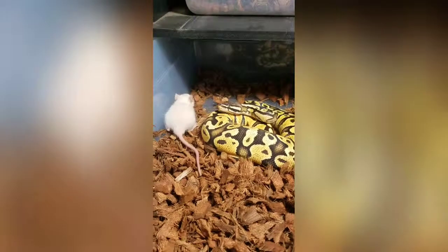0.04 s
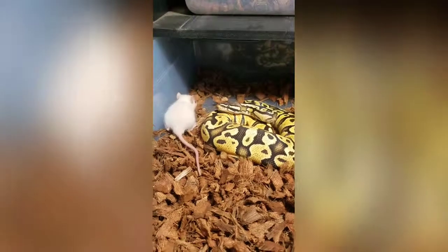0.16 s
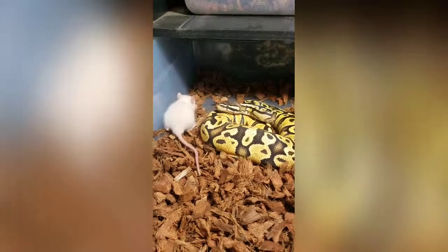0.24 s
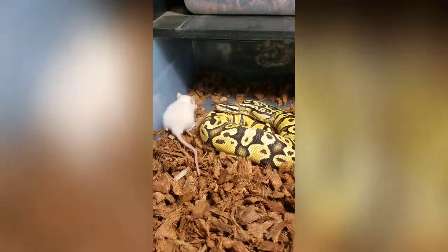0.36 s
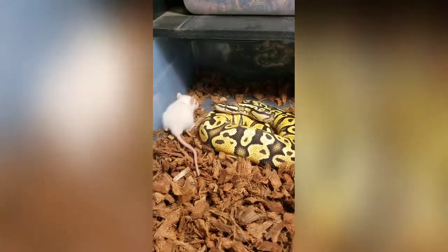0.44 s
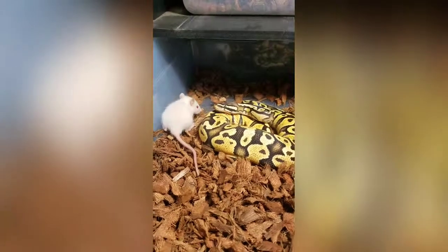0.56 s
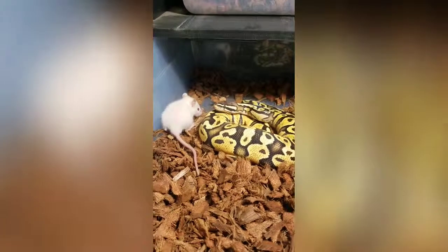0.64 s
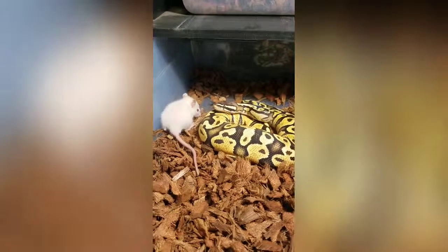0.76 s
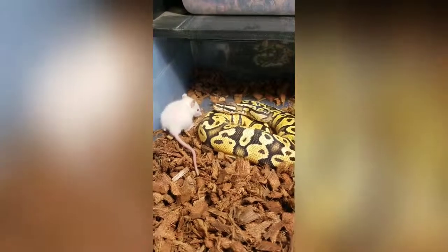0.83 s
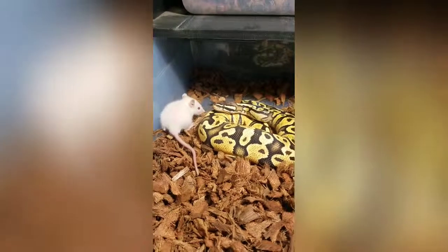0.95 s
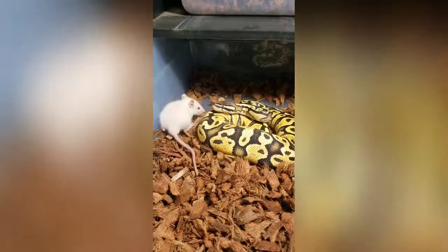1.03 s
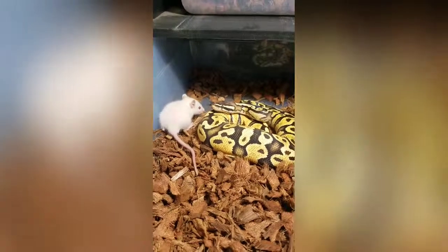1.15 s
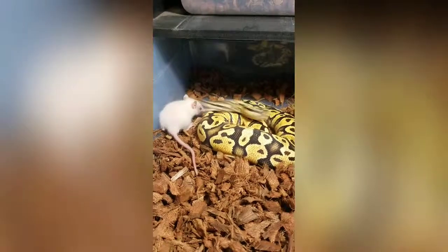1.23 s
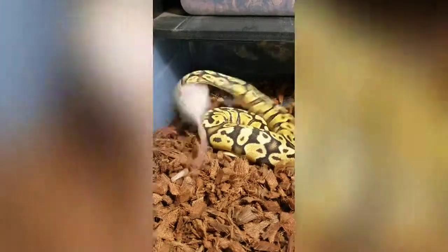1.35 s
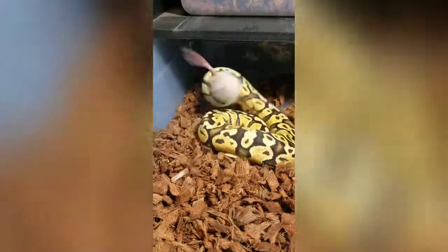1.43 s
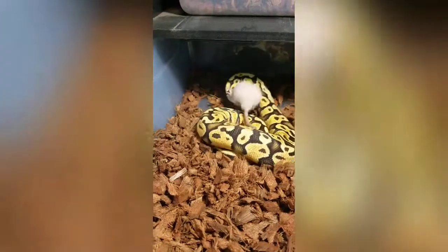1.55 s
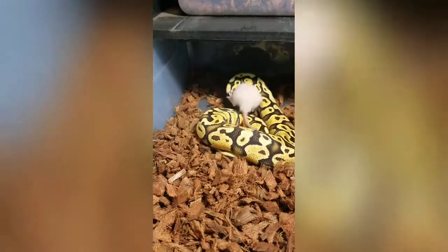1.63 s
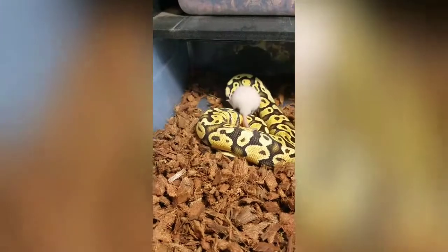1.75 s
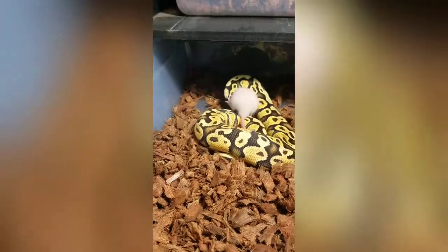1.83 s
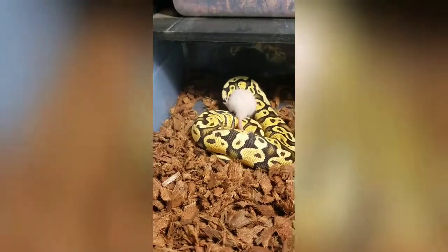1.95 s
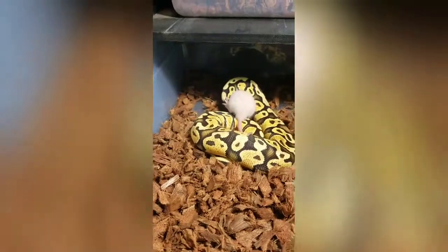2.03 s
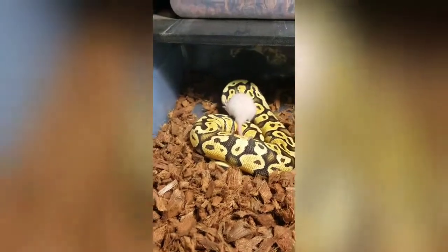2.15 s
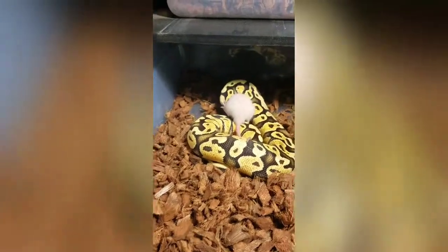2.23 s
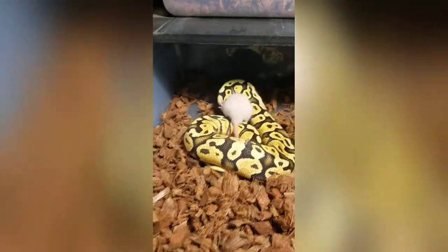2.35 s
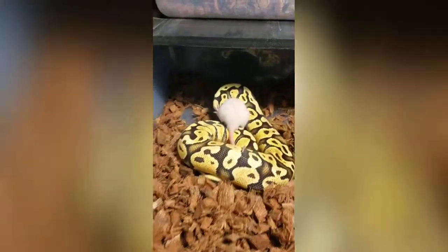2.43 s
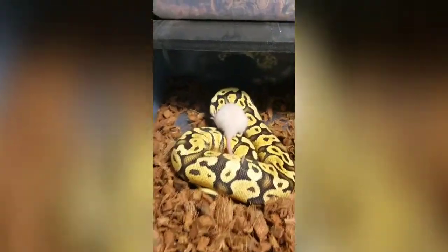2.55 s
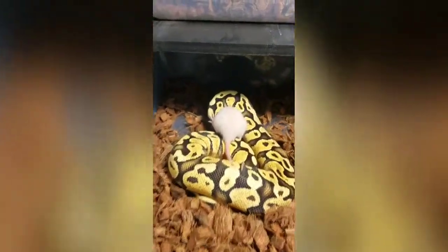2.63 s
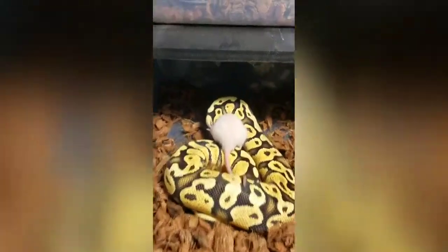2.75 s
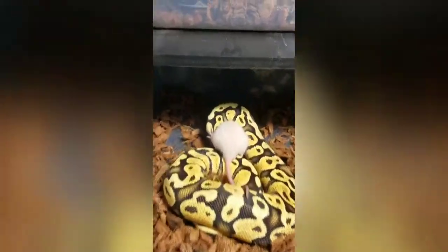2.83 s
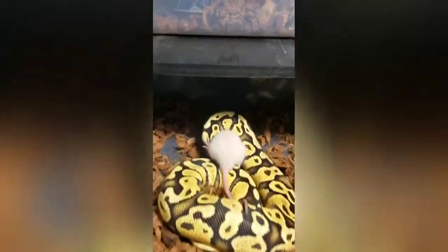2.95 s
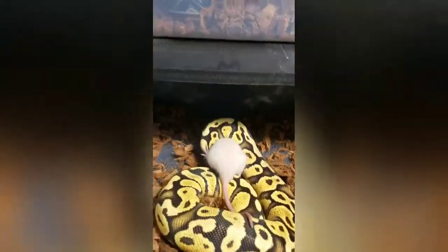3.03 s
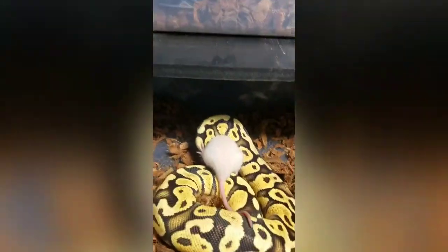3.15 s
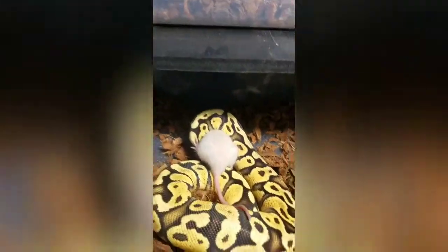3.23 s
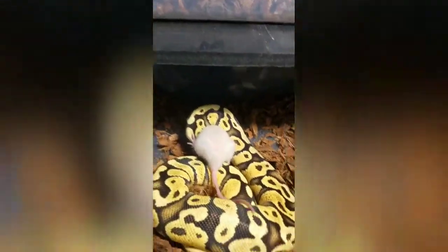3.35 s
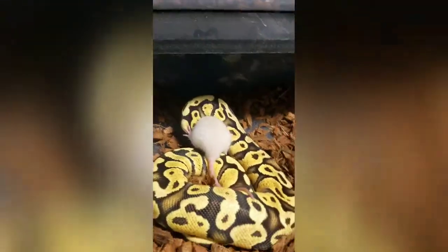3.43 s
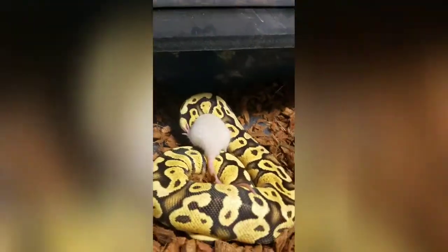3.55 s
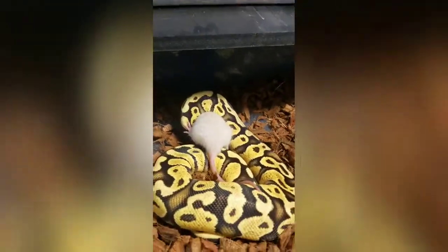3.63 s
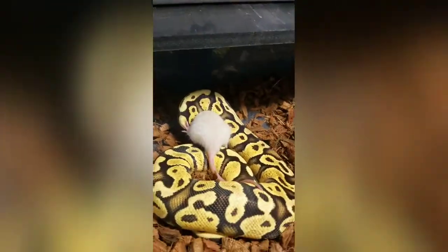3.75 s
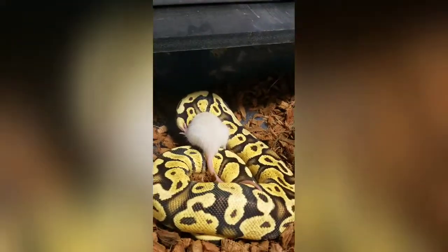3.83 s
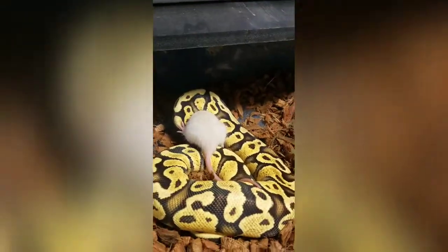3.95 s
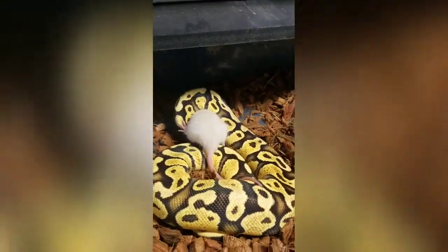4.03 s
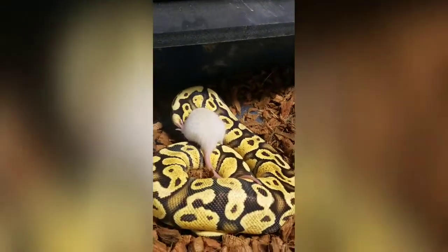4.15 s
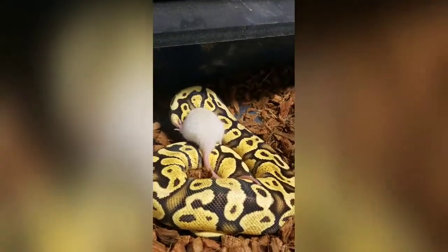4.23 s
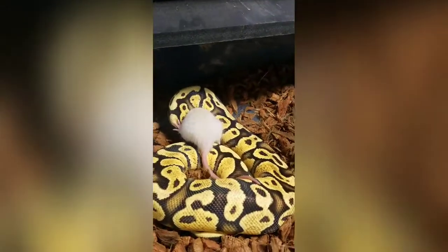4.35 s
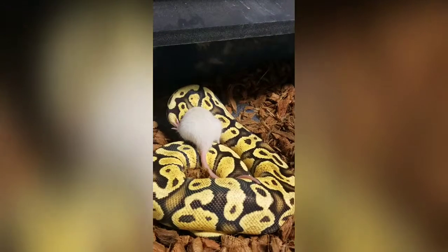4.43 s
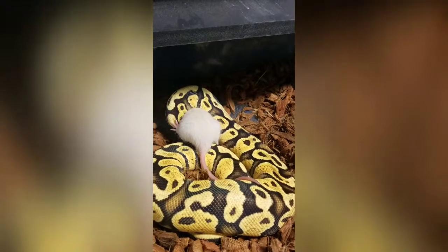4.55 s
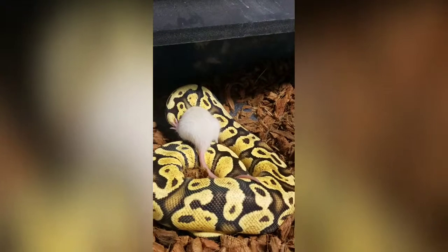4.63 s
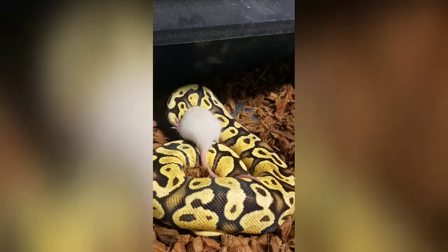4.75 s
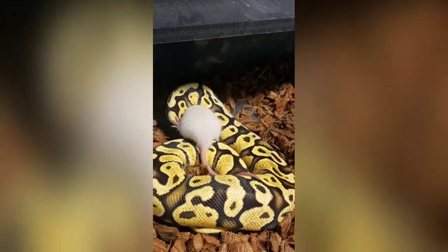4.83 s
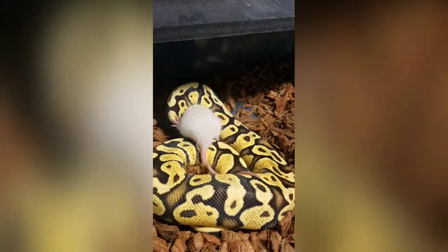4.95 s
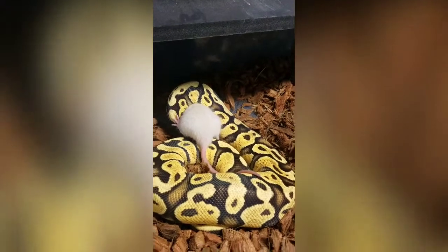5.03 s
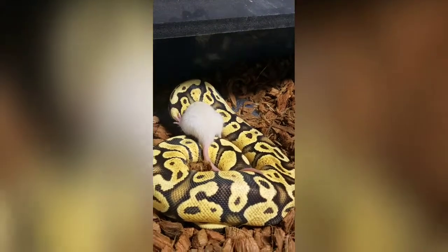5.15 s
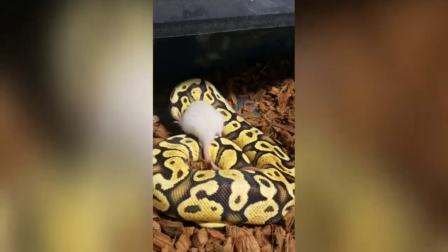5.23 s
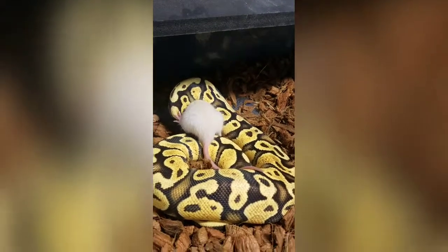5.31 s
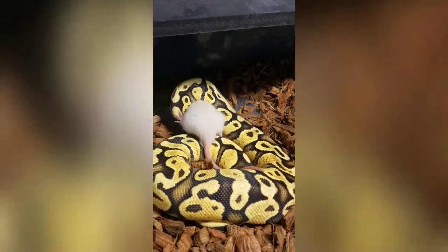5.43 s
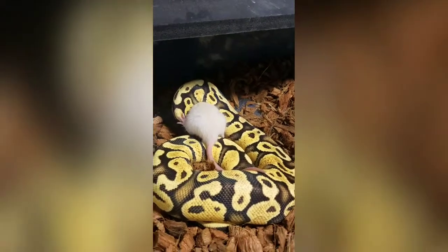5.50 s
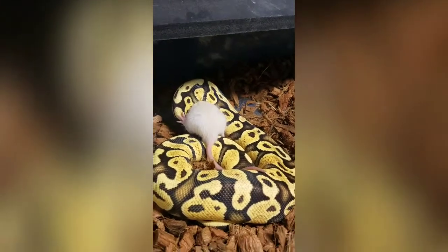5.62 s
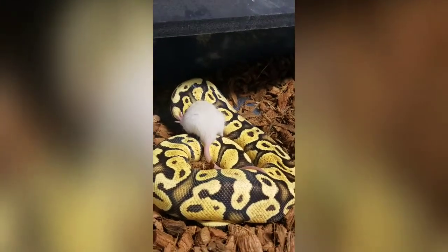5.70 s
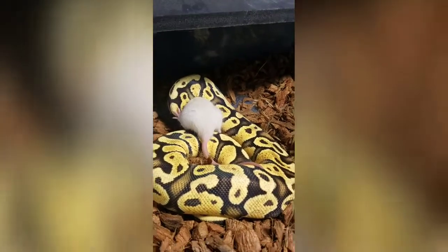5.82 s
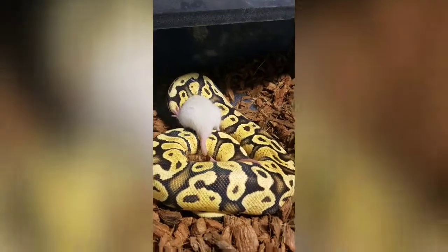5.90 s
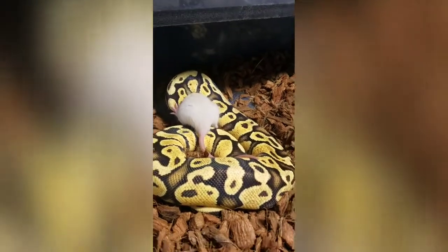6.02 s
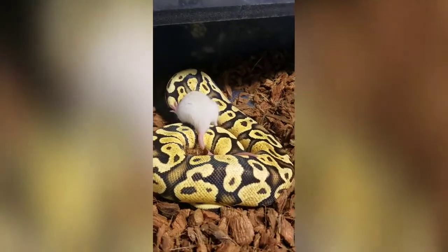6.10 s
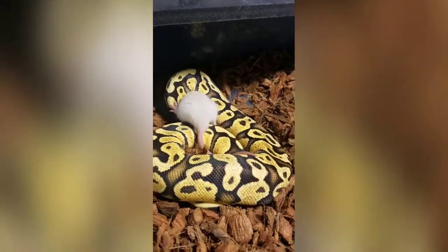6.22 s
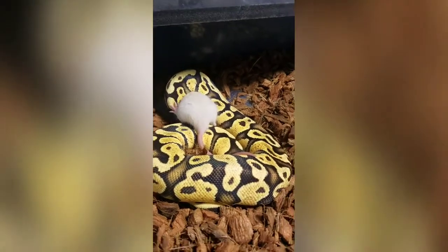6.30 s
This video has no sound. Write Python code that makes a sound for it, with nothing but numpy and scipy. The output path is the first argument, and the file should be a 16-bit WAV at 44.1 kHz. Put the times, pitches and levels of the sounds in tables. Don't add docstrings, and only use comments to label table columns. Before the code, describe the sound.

Close stereo pickup indoors: low room rumble and thin hiss, then a boomy plastic thud with crackling bark as a snake lunges. A rodent's piercing, fluttering squeal bursts out at once, followed by a brief cry. Small clicks and ticks fill the gap. Further squeals return while it is squeezed, gradually rougher, breathier and weaker, ending in short broken lower squeaks and slight wall knocks.

```python
import sys
import numpy as np
from scipy import signal
from scipy.fft import rfft, irfft, next_fast_len
from scipy.io import wavfile
from scipy.ndimage import uniform_filter1d

SR = 44100
rng = np.random.default_rng(int(sys.argv[2]) if len(sys.argv) > 2 else 0)


def unload_wav(signal):
    wavfile.write(
        sys.argv[1],
        SR,
        np.round(np.clip(np.atleast_2d(signal).T, -1, 1) * 32767).astype(np.int16),
    )


def gain_from_db(level_db):
    decades = np.asarray(level_db, float) / 20
    return 10 ** decades


N = 280917
MOUTH_DB = 4

# t/s, effort/dB, pitch/Hz
STRUCK_CALLS = [
    [(1.396, -34.5, 2050), (1.446, -20.5, 2200), (1.506, -14, 2100), (1.6, -15.5, 2111),
     (1.68, -17.5, 2201), (1.772, -17.5, 2151), (1.808, -29.5, 2200)],
    [(2.109, -31.5, 2290), (2.129, -21.5, 2277), (2.161, -21.5, 2278), (2.19, -17, 2230),
     (2.203, -29.5, 2270)],
]
COILED_CALLS = [
    [(3.582, -31.5, 2203), (3.604, -23.5, 2195), (3.7, -19.5, 2168), (3.79, -20.5, 2124), (3.87, -22, 2104),
     (3.902, -24, 2160), (3.915, -27.5, 2248), (3.965, -27.5, 2222), (3.979, -32, 2270)],
    [(4.289, -23, 1975), (4.31, -22, 1959), (4.32, -18, 2095), (4.41, -18, 2110), (4.5, -23.5, 2078),
     (4.535, -24, 2151), (4.58, -25.5, 2027), (4.629, -32, 1900)],
]
FAILING_CALLS = [
    [(4.961, -27, 2060), (4.985, -24.5, 1947), (5.016, -19.5, 2058), (5.035, -21, 2030), (5.146, -24, 2049),
     (5.165, -26, 2036), (5.214, -28.5, 1900), (5.282, -24.5, 1875)],
    [(5.712, -24.5, 1940), (5.73, -22, 2013), (5.76, -25.5, 2046), (5.785, -21.5, 2020),
     (5.86, -21.5, 2038), (5.906, -31.5, 1982), (5.95, -24.5, 1824), (5.969, -32.5, 1834)],
]
# left-right/dB, lift of first tone/dB, lift of second tone/dB, breath hiss/dB
POSES = [(-6.5, 2, -4.5, -16), (-5.5, -8, -3.5, -16.5), (-7.5, 2, 1.5, -6.5), (-7.5, -0.5, -1.5, -8),
         (-3.5, 3, 2.5, -5), (-6.5, -1, 2, -5)]
FLUTTERS_HZ = [68, 75, 92, 76, 72, 72]
# t/s, length/s, effort/dB, first pitch/Hz, last pitch/Hz
LOW_NOTES = [(4.633, 0.047, -27.5, 1336, 1416), (5.286, 0.074, -25.5, 1397, 1353),
             (5.368, 0.03, -29, 1403, 1325), (5.394, 0.036, -26, 1426, 1356),
             (5.97, 0.028, -27, 1286, 1110), (6.002, 0.046, -31, 1936, 1540),
             (6.052, 0.096, -32.5, 1420, 1305), (6.168, .036, -28.5, 1278, 1458)]
LOW_POSE = (-6.5, 1, -0.5, -7.5)
CLEAR, SHAKY, FLUTTER, TRILL = (.13, .006, .04), (.14, .01, .3), (.15, .025, .08), (.15, .055, .06)
SPLIT, TORN, ROUGH, RASPY = (.2, .008, .9), (.33, .022, .75), (.58, .04, .65), (.82, .03, .3)
WHEEZE, CRACKED = (.33, .016, .9), (.26, .012, .1)
# t/s, state
FOLD_STATES = [(0, TORN), (1.44, ROUGH), (1.485, FLUTTER), (1.615, TRILL), (1.787, ROUGH), (3.645, FLUTTER),
               (3.785, CLEAR), (3.915, TORN), (4.1, SPLIT), (4.316, FLUTTER), (4.4, SHAKY), (4.45, CLEAR),
               (4.521, ROUGH), (4.541, CLEAR), (4.63, RASPY), (4.8, TORN), (5.01, SHAKY), (5.13, CLEAR),
               (5.283, CRACKED), (5.36, RASPY), (5.6, TORN), (5.785, SHAKY), (5.825, CLEAR), (5.963, SHAKY),
               (6.004, WHEEZE), (6.16, RASPY)]
# f/Hz, level/dB
THROAT = [(350, -52), (600, -15.5), (1570, -28.5), (2090, -17.5), (3120, -11.5), (4050, -7.5), (5330, -7),
          (6290, 3), (7300, -4), (8390, -13.5), (9240, -21), (11800, -14), (16000, -20.5)]
# f/Hz, level/dB per Hz
RASP = [(88, -61.5), (150, -36.5), (601, -17), (745, -20), (821, -16.5), (1140, -15.5), (1390, -19),
        (2980, -11.5), (4000, -13), (5790, -8), (6770, -4.5), (9440, -17.5), (14800, -40.5), (16000, -47)]
# pitch multiple, second multiple, level/dB
MIXING_TONES = [(3, -1, -18.5), (-3, 2, -23), (2, -1, -31), (4, -2, -31), (5, -1, -24.5)]
# t/s, floor boom/dB, wall knock/dB
THUDS = [(1.284, -22, -33.5), (1.342, -29, -36), (1.393, -46, -44), (1.519, -40, -26), (1.55, -34.5, -31),
         (2.172, -69, -57), (3.617, -37.5, -32.5), (4.979, -69, -64), (5.229, -63, -46),
         (6.088, -43, -48.5), (6.133, -62, -35.5), (6.145, -35, -39), (6.171, -42, -35)]
# t/s, knock/dB, tick/dB, left-right/dB
TICKS = [(0.752, -58, -79.5, -23), (1.019, -73, -65, -7), (2.38, -43.5, -47, -1.5),
         (2.816, -44.5, -64, -16.5), (2.932, -52.5, -58, -15.5), (2.951, -51.5, -65, -21),
         (3.271, -53, -66, -16.5), (3.38, -67, -44.5, -8.5), (4.265, -67, -48, -14)]
# f/Hz, level/dB, t60/s
FLOOR_MODES = [(101.9, 8, 0.15), (62, -9.5, .15), (139, -9.5, 0.13)]
# f/Hz, level/dB, t60/s
WALL_MODES = [(200, 8, .07), (306.6, 4.5, 0.045), (443, 8.5, 0.02), (630, -12, .04), (1040, -7.5, 0.019)]
# f/Hz, level/dB per Hz
CHIP_SNAP = [(300, -12), (1000, 3), (2500, 4), (5000, 1), (8000, -4), (16000, -23)]
# t/s, level/dB
SCUFF = [(1.245, -67.5), (1.289, -30.5), (1.337, -44), (1.389, -39), (1.401, -35.5), (1.42, -35.5)]
# f/Hz, level/dB per Hz
CHIPS = [(180, -3.5), (300, 2), (546, -8), (678, -12), (774, -13.5), (1140, -7.5), (1300, -6), (1530, -8),
         (7440, -23), (16000, -43.5)]
# f/Hz, t60/s
ROOM_T60 = [(500, 0.74), (1300, 0.56), (3500, 0.41), (7000, 0.42), (10000, 0.44), (15000, 0.09)]
# f/Hz, level/dB per Hz
RUMBLE = [(12, -40), (20, -8), (22, -22), (122, -1), (151, -7), (285, -5), (306, -18), (447, -9),
          (526, -21), (728, -17.5), (1500, -25), (1950, -62), (3300, -120)]
# f/Hz, level/dB per Hz
CAPSULE_HISS = [(880, -33), (1500, -3.5), (1670, -4.5), (2320, -2), (2690, -4), (5330, -13), (7100, -10),
                (8240, -20.5), (14100, -22), (16000, -21)]
# f/Hz, correlation/-1..1
LIKENESS = [(60, 0.83), (180, 0.98), (550, 0.62), (1650, -0.14), (4970, -0.01), (15000, -0.0)]
# t/s, level/dB
SWELL = [(0, 0), (1.2, 0), (2.6, 1.5), (3.4, 1.5), (4.2, 4), (4.9, 3.5), (5.6, 3), (6.37, 3)]
# f/Hz, left-right/dB
PORT_SHADING = [(200, -12.5), (700, 4), (1400, -2), (3000, 1), (6500, -1.5), (9000, 1.5), (12000, 10),
                (15000, 7.5)]


def evened(x):
    return x / np.sqrt(np.mean(x ** 2) + 1e-20)


def read(points, hz):
    f, value = np.transpose(points)
    return np.interp(np.log(np.abs(hz) + 1), np.log(f + 1), value)


def coloured(x, points):
    size = next_fast_len(x.shape[-1])
    gain = gain_from_db(read(points, np.fft.rfftfreq(size, 1 / SR)))
    return irfft(rfft(x, size) * gain, size)[..., :x.shape[-1]]


def wander(count, hz):
    noise = rng.standard_normal(count + 4000)
    return evened(signal.lfilter(*signal.butter(2, hz, fs=SR), noise)[4000:])


def add(mix, start_s, sound):
    part = mix[..., round(start_s * SR):][..., :sound.shape[-1]]
    part += sound[..., :part.shape[-1]]


def squeal(rows, side_db, first_db, second_db, hiss_db, flutter_hz=70):
    start_s, *columns = np.transpose(rows)
    t = np.arange(start_s[0] - .004, start_s[-1] + .004, 1 / SR)
    count = len(t)
    effort_db, hz = (np.interp(t, start_s, c) for c in columns)
    pan_db = side_db + 2 * wander(count, 15)
    rasp, depth, half = folds(t)

    cycle = (np.cumsum(flutter_hz * (1 + .3 * wander(count, 35))) / SR + rng.random()) % 1
    ramp = uniform_filter1d(np.tanh(9.0 * (2 * cycle - 1.15)) + .4 * cycle, 50)
    ramp *= 1 + .2 * wander(count, 30)
    flutter = depth * (1.1 * ramp + .25 * wander(count, 120))
    jitter = .06 * rasp ** 2 * wander(count, 400)
    moving_hz = hz * (1 + flutter + jitter)
    turns = np.cumsum(moving_hz) / SR

    lacking_db = (effort_db.max() - effort_db) * (t < t[effort_db.argmax()])
    low_db = first_db + 0.65 * lacking_db
    tone = np.zeros(count)
    for k in range(1, 27):
        share = half if k % 2 else 1 + 4.0 * (k == 2) * (hz < 1550)
        jaw_db = np.where(k * hz < 6400, low_db, second_db * (k * hz < 10400))
        open_db = 0.66 * (hiss_db + 11) * (k * hz > 14600)
        level = share * gain_from_db(read(THROAT, k * moving_hz / 2) + jaw_db + open_db)
        tone += level * np.cos(np.pi * k * turns + 2 * np.pi * rng.random())
    tone *= gain_from_db(1.4 * wander(count, 48))
    tone = tone / np.sqrt(uniform_filter1d(tone ** 2, 1500) + 1e-12)
    second_hz = 3830
    for m, n, db in MIXING_TONES:
        tone += gain_from_db(db) * (hz > 1800) * np.cos(2 * np.pi * (m * turns + n * second_hz * t))

    throb = 1 - np.clip(13 * depth, 0, .7) * np.exp(-np.minimum(cycle, 1 - cycle) / .11)
    air = evened(coloured(rng.standard_normal((2, count)), RASP)) * gain_from_db(2.5 * wander(count, 100))
    hiss = evened(np.diff(rng.standard_normal((2, count + 3)), 3))
    calm_db = -8 * np.clip(1.3 - depth / .02, 0, 1)
    voice = np.sqrt(1 - rasp ** 2) * tone * throb * gain_from_db(-42 * depth * ramp)
    voice = voice + rasp * air * .9 + gain_from_db(hiss_db + calm_db) * hiss
    edge = np.clip(np.minimum(t - t[0], t[-1] - t) / .004, 0, 1)
    sides_db = np.outer([.5, -.5], pan_db)
    return t[0], tub(gain_from_db(effort_db + MOUTH_DB + sides_db) * voice * edge)


def folds(t):
    at_s, states = zip(*FOLD_STATES)
    soft_s = np.linspace(-.5, .5, num=9)[:, None] * .024
    return np.array(states)[np.searchsorted(at_s, t + soft_s) - 1].mean(0).T


def low_note(start_s, length_s, effort_db, first_hz, last_hz):
    rasp = folds(np.array([start_s + length_s / 2]))[0, 0]
    first_db = effort_db - MOUTH_DB
    last_db = first_db - 18.5 * rasp
    return [(start_s, first_db, first_hz), (start_s + length_s, last_db, last_hz)]


def tub(x):
    t60_s, echo_db, lead_s = .02, -7, .00044
    t = np.arange(1200) / SR
    echoes = rng.standard_normal((2, len(t))) * gain_from_db(-60 * t / t60_s) * (t > .0004)
    paths = gain_from_db(echo_db) * echoes / np.linalg.norm(echoes, axis=1, keepdims=True)
    paths[[0, 1], [0, round(lead_s * SR)]] += 1
    return signal.oaconvolve(x, paths, axes=1)


def ports(x):
    left = [(f, db / 2) for f, db in PORT_SHADING]
    right = [(f, -db / 2) for f, db in PORT_SHADING]
    return np.array([coloured(x[0], left), coloured(x[1], right)])


def scuff():
    at_s, db = np.transpose(SCUFF)
    t = np.arange(at_s[0], at_s[-1], 1 / SR)
    spikes_db = 2.7 * np.minimum(rng.exponential(1, (2, len(t))), 5)
    grains = rng.standard_normal((2, len(t))) * gain_from_db(spikes_db)
    level = gain_from_db(np.interp(t, at_s, db) + 8.5)
    return at_s[0], level * evened(coloured(grains, CHIPS)) * gain_from_db([[-1.5], [1.5]])


def knocks():
    out = np.zeros((2, N))
    for at_s, boom_db, knock_db in THUDS:
        boom = gain_from_db(boom_db) * ring(FLOOR_MODES) * gain_from_db([[.6], [-.6]])
        knock = gain_from_db(knock_db) * ring(WALL_MODES) * gain_from_db([[-1.5], [1.5]])
        add(out, at_s, boom + knock)
    t = np.arange(1500) / SR
    damping = gain_from_db(-np.arange(SR // 4) / SR * 1500)
    for at_s, knock_db, tick_db, pan_db in TICKS:
        sides = gain_from_db([[pan_db / 2], [-pan_db / 2]])
        snap = evened(coloured(rng.standard_normal((2, len(t))), CHIP_SNAP))
        add(out, at_s, gain_from_db(knock_db) * ring(WALL_MODES) * damping * sides)
        add(out, at_s, gain_from_db(tick_db + 1.5 - 60 * t / 0.024) * snap * sides)
    return out


def ring(modes):
    t = np.arange(SR // 4) / SR
    sound = np.zeros(len(t))
    for hz, db, t60_s in modes:
        sound += gain_from_db(db - 60 * t / t60_s) * np.sin(2 * np.pi * hz * rng.uniform(.98, 1.02) * t)
    sound *= 1 - np.exp(-t / 0.001)
    return sound / np.sqrt(np.mean(sound[:900] ** 2))


def room(x):
    taps = np.zeros((2, SR))
    at = np.arange(400, SR - 20, 20) + rng.integers(0, 20, (2, (SR - 401) // 20))
    np.put_along_axis(taps, at, rng.choice([-1., 1.], at.shape), 1)
    hz, t, z = signal.stft(taps, SR, nperseg=256)
    decay = gain_from_db(-60 * t / read(ROOM_T60, hz)[:, None])
    tail = signal.istft(z * decay, SR, nperseg=256)[1]
    return signal.fftconvolve(x[None], tail / np.linalg.norm(tail[0]), axes=1)[:, :N]


def room_tone():
    frames, hz = N // 256 + 5, np.fft.rfftfreq(1024, 1 / SR)
    a, b, c, d, patches = rng.standard_normal((frames, 513, 5)).T
    patches = evened(uniform_filter1d(uniform_filter1d(patches, 10, 0), 10, 1))
    same = np.clip(read(LIKENESS, hz), -1, 1)[:, None]
    left = a + 1j * b
    right = same * left + np.sqrt(1 - same ** 2) * (c + 1j * d)
    z = np.array([left, right]) * gain_from_db(1.3 * patches)
    z *= np.hypot(gain_from_db(read(RUMBLE, hz)), gain_from_db(read(CAPSULE_HISS, hz) - 21))[:, None]
    tone = evened(signal.istft(z, nperseg=1024, noverlap=768)[1][:, :N])
    at_s, db = np.transpose(SWELL)
    return gain_from_db(-61.5 + 4.0 + np.interp(np.arange(N) / SR, at_s, db)) * tone


def scene():
    rodent = np.zeros((2, N))
    for rows, pose, flutter_hz in zip(STRUCK_CALLS + COILED_CALLS + FAILING_CALLS, POSES, FLUTTERS_HZ):
        add(rodent, *squeal(rows, *pose, flutter_hz))
    for row in LOW_NOTES:
        add(rodent, *squeal(low_note(*row), *LOW_POSE))
    smeared = rodent.mean(0) * wander(N, 180)
    mix = ports(rodent) + gain_from_db(-17.5) * room(smeared) + knocks() + room_tone()
    add(mix, *scuff())
    return mix


def band_limit(x):
    return signal.sosfilt(signal.butter(12, 17000, fs=SR, output="sos"), x)


def record(dry):
    bent = signal.lfilter(*signal.butter(2, [110, 900], "band", fs=SR), dry ** 2)
    pressed = 1.038 * np.tanh((dry + 0.16 * bent) / 1.134)
    low_pass = signal.firwin(401, 15850, window=("kaiser", 7), fs=SR)
    edged = signal.oaconvolve(pressed, low_pass[None], "same")
    edged = signal.lfilter(*signal.butter(2, 40, "high", fs=SR), edged)
    return band_limit(edged)


dry = scene()
out = record(dry)
unload_wav(out)
```